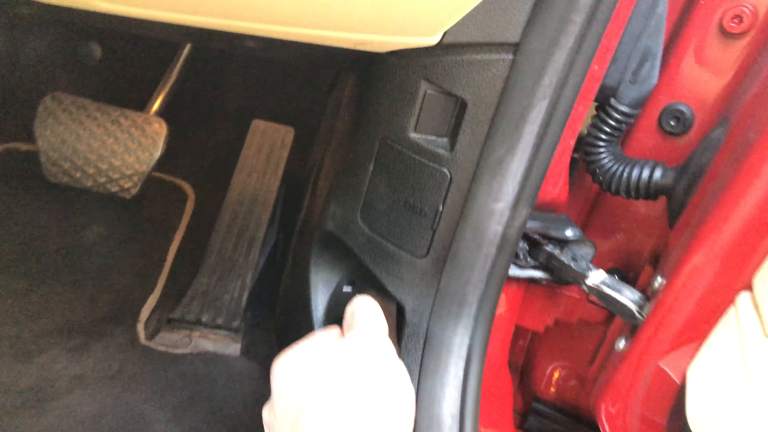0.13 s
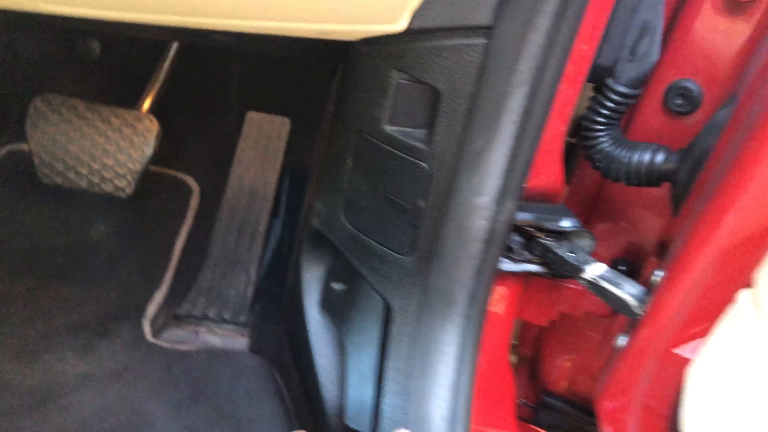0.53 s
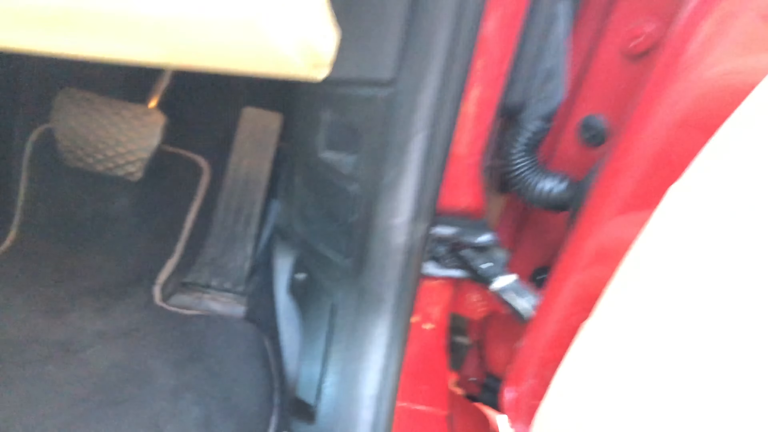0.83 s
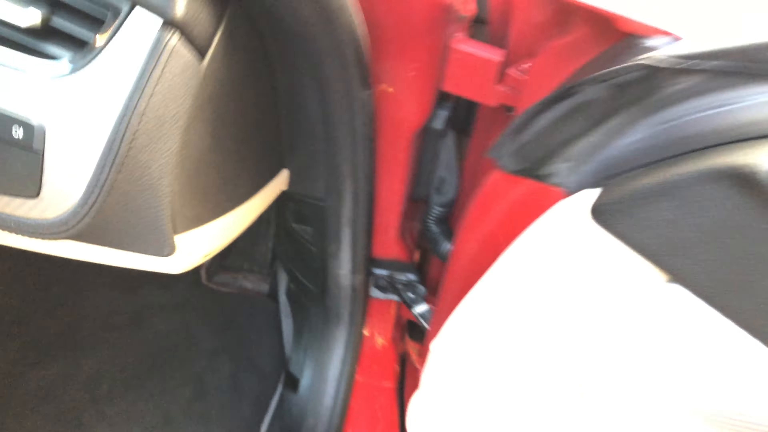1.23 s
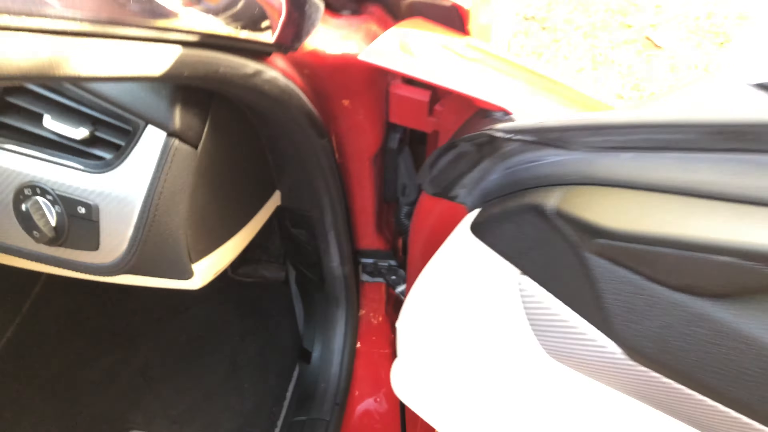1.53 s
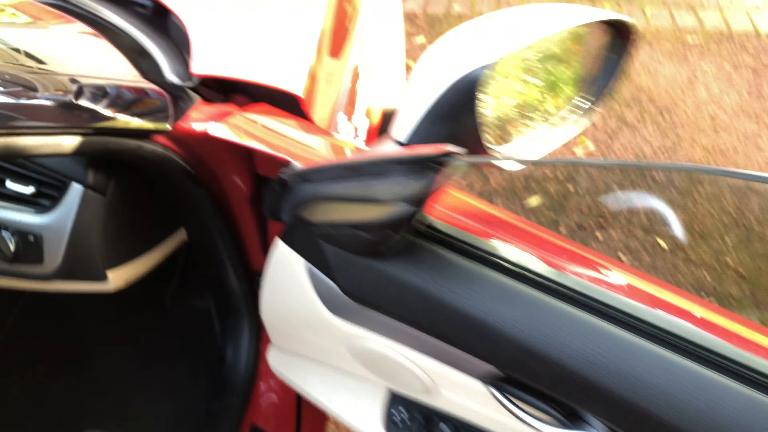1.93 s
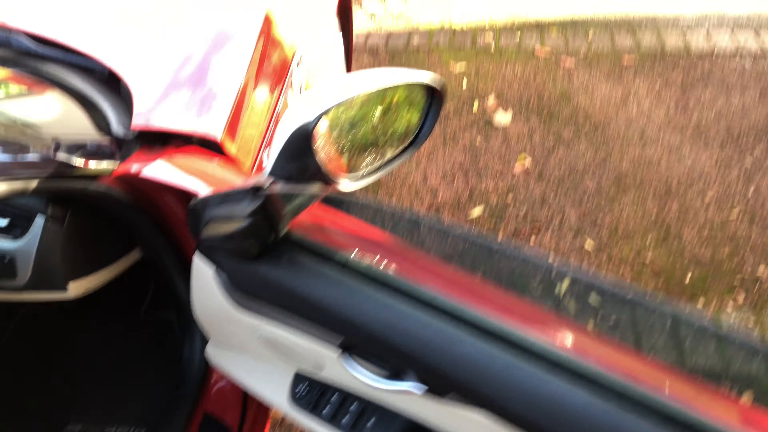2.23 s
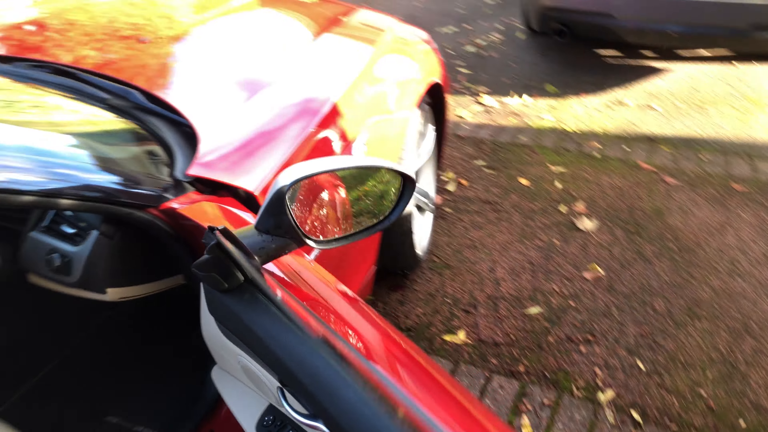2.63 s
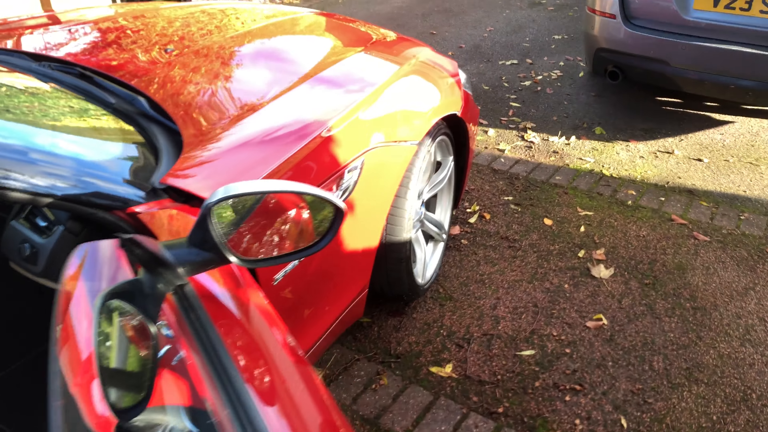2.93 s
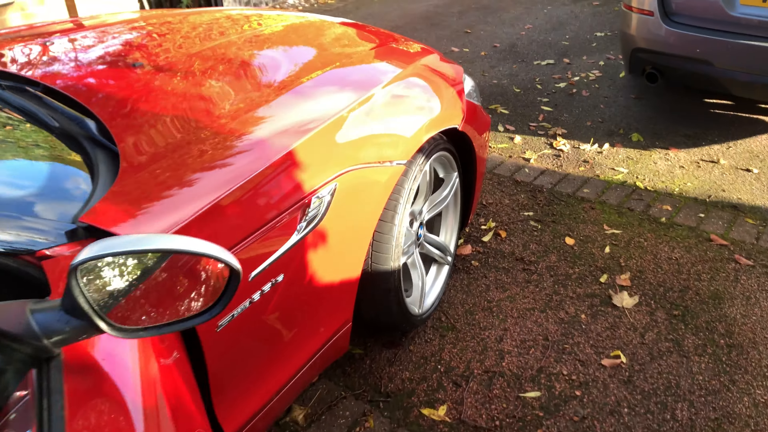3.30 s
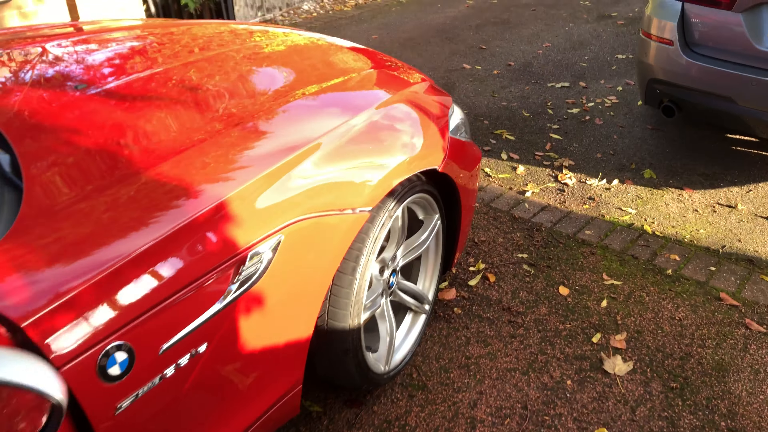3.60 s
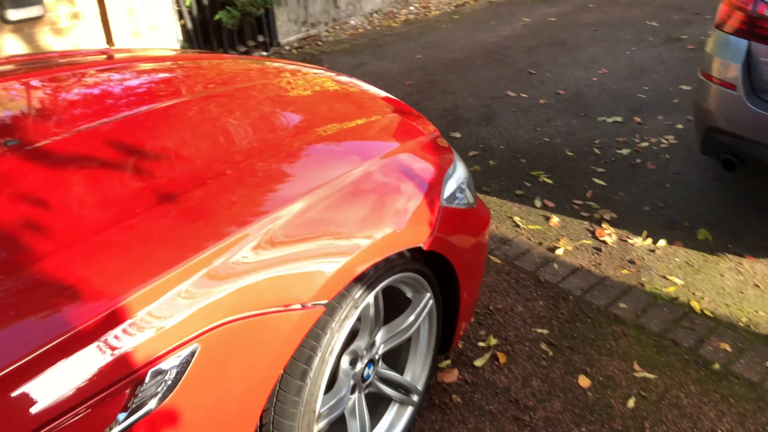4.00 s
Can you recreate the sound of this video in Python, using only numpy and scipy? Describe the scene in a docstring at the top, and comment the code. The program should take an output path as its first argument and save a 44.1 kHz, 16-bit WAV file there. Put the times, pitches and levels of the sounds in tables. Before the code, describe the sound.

In a car's footwell, a bonnet release lever is pulled with a sudden booming clunk, and the plastic handle snaps back. Clothes rustle and small clicks follow as someone stands and walks over gritty paving with dry leaves. Wind thumps on the close microphone, strongest midway, then eases. Distant traffic hums faintly, and a thin hiss rises near the end.

```python
"""In a car's footwell a hand pulls the bonnet release: the cable snaps the latch free, the body panels boom
and the plastic lever springs back. The person stands up and walks on paving strewn with dry leaves.
Plastic, grit and leaves click in short resonant bursts; cloth and soles rub in swells of grainy hiss.
Gusts thump on the microphone, far traffic hums, and a thin hiss rises near the end."""
import sys
import numpy as np
from scipy.fft import rfft, irfft, next_fast_len
from scipy.io import wavfile
from scipy.ndimage import map_coordinates

SR = 44100
rng = np.random.default_rng(int(sys.argv[2]) if len(sys.argv) > 2 else 0)


def to_wav(s):
    """Save 16-bit WAV."""
    ch = np.atleast_2d(s).T  # columns
    pcm = np.round(np.clip(ch, -1, 1) * 32767)  # PCM
    wavfile.write(sys.argv[1], SR, pcm.astype(np.int16))


N = 183279


def release():
    """Latch and lever knock the body: a few big panels ring, the small ones blur into a dying thud."""
    blows = [(.077, -6.5, 0.0031, 0.46), (.096, -15.5, 0.0036, 1.2), (0.212, -19, 0.0049, 0.55),
             (0.329, -25, 0.005, 0.85), (.395, -7, 0.004, 0.22), (0.48, -30, 0.0012, 0.21),
             (0.513, -21.5, 0.003, 0.44)]  # knocks into the body: t/s, level/dB, softness/s, ring length factor
    panel_modes = [(111, -7.5, 0.29), (190.7, -4, 0.088), (246.5, -5, 0.3), (427, 2, 0.11),
                   (583, 4.5, 0.096), (740, -2, 0.19), (1020, 19, 0.033)]  # big panels: f/Hz, level/dB, base t60/s
    rattle = [(60, -36), (150, 2), (300, 2.5), (600, -7), (1000, -11.5), (1600, -17.5), (3000, -48)]  # spectrum of the many small panels: f/Hz, level/dB
    boom = [(0.092, 86.1, 3.5, 0.012, 0.19)]  # the freed bonnet jumps and swings: t/s, f/Hz, level/dB, rise/s, t60/s
    snaps = [(0.331, -25), (.393, -7.5)]  # the lever springs back: t/s, level/dB
    lever_modes = [(1330, -14, 0.03), (1950, -6, 0.022), (3204, -5, 0.016), (5320, -5, 0.04),
                   (10930, -20, .02)]  # plastic lever: f/Hz, level/dB, base t60/s
    out, t = np.zeros(N), np.arange(SR // 2) / SR
    for s, db, soft, life in blows:
        thud = noise(rattle, len(t)) * amp(-60 * t / (0.49 * life)) * (1 - np.exp(-t / soft))
        add(out, s, amp(db) * (ring(panel_modes, soft, life, scatter_db=4.5) + amp(-9) * thud))
    for s, hz, db, rise, t60 in boom:
        envelope = amp(db - 60 * t / t60) * (1 - np.exp(-t / rise)) ** 2
        add(out, s, envelope * np.sin(2 * np.pi * hz * t))
    for s, db in snaps:
        add(out, s, amp(db) * ring(lever_modes, soft=.0001, life=0.71, scatter_db=0.5))
    return out


def ring(modes, soft, life, scatter_db):
    """A struck part's modes, t60 scaled by life; a soft blow slows the attack and dulls the highs."""
    t = np.arange(SR // 2) / SR
    tones = np.zeros(len(t))
    for hz, db, t60 in modes:
        decay = amp(db + rng.normal(0, scatter_db) - 60 * t / (t60 * life))
        tones += decay / (1 + (hz * soft) ** 2) * np.sin(2 * np.pi * (hz * t + rng.random()))
    return tones * (1 - np.exp(-t / soft))


def clicks():
    """Plastic, grit and leaves: each click is a broad crack, a ragged three-band burst and a clean ping."""
    hits = [(0.055, -15, 3120, -4, -33, 0.0081), (0.0601, -15, 1530, -0.5, -28, 0.023),
            (0.0709, -9, 2610, -0.5, -13, 0.059), (0.0766, -2, 4860, -2, -1, 0.036),
            (0.131, -15.5, 1910, -19, -4, 0.038), (0.2072, -28.5, 1480, 5, -16, 0.077),
            (0.2547, -27, 5680, -3, -12, 0.035), (0.328, -18.5, 4730, -18, -24, 0.033),
            (0.3312, -16, 3630, -31, -25, 0.061), (0.345, -11, 7140, -9, 1, 0.023),
            (0.356, -29, 7000, 4, -15, 0.046), (0.3856, -26, 4060, 0, -6, 0.078),
            (0.392, -4, 5290, -22, 5.5, 0.034), (0.4405, -28, 1990, 5, -19, 0.025),
            (0.4758, -33, 1730, 0.5, -18, 0.082), (0.5155, -11, 7700, -6, 3, 0.011),
            (0.521, -26, 4500, -16, -17, 0.051), (0.5321, -21, 1860, -30, -9, 0.035),
            (0.6386, -12.5, 2334, -9.5, -7, 0.072), (.641, -11.5, 5600, -34, -21, 0.068),
            (0.655, -19.5, 2760, -7.5, -6, 0.045), (0.704, -32, 2980, -18, -9, .036),
            (0.735, -27.5, 5200, -23, 5, .026), (0.763, -16, 2950, -10.5, -10, 0.048),
            (0.785, -24, 2270, -24, -21, 0.016), (.917, -27, 3300, -25, -10, 0.022),
            (1.013, -33, 4960, -25, -15, 0.015), (1.039, -23.5, 1640, -3, -6, 0.017),
            (1.0968, -27.5, 2570, 3, -10, 0.024), (1.1317, -22, 2660, 4.5, -11, 0.033),
            (1.1572, -26, 2900, 1, -10, 0.034), (1.1803, -28.5, 3130, -9, -7, 0.02),
            (1.1953, -36.5, 6860, -7, -2, .03), (1.244, -22, 3170, -1, -12, 0.026),
            (1.255, -19, 2150, -8, -27, 0.011), (1.289, -32, 3060, -1, -8, 0.019),
            (1.3753, -34, 4560, -12, -9, 0.079), (1.4027, -24, 3270, -6, -24, 0.038),
            (1.43, -28.5, 6800, -20, -1, 0.021), (1.513, -27, 2350, -19, -8, 0.015),
            (1.5314, -21.5, 1670, -34, -23, 0.028), (1.557, -44, 9050, -10, 7, .025),
            (1.8079, -51, 5260, 14.5, 12, 0.18), (1.8564, -27, 2770, 0, -22, 0.024),
            (1.878, -31, 2830, -1, -16, 0.054), (1.893, -26.5, 4130, -24, -21, .023),
            (1.908, -16, 2300, -37, -34, 0.019), (1.927, -13, 3930, -23, -26, 0.028),
            (1.9332, -7.5, 4010, -28, -30, 0.047), (1.936, -8.5, 2620, -23, -29, .03),
            (1.986, -21, 5060, -25, -8, 0.0063), (2.005, -20.5, 4240, -7, -17, 0.027),
            (2.0363, -24.5, 2110, -28, -22, 0.15), (2.0508, -16, 3570, -28, -32, 0.046),
            (2.0535, -17.5, 3690, -34, -9.5, 0.043), (2.092, -26.5, 2210, -20, 0, 0.1),
            (2.099, -10.5, 2130, -24, -7.5, 0.03), (2.1047, -16, 1850, -3.5, 0, .047),
            (2.357, -37.5, 3880, -16, -21, 0.042), (2.5678, -32.5, 2070, 3.5, -3.5, 0.022),
            (2.7136, -24, 2660, -6.5, -8, 0.04), (2.7548, -34, 1740, 1, -1, .04),
            (2.788, -40, 4280, -6, -5, 0.075), (2.828, -34, 1380, 3.5, -7, 0.047),
            (2.968, -48, 9000, -20, 0, 0.017), (3.017, -42.5, 2530, 0, -3, .059),
            (3.208, -34.5, 1930, 2, -9, 0.052), (3.3787, -35.5, 1890, 2, -30, 0.077),
            (3.3969, -26, 1710, -7, -23, 0.054), (3.539, -35.5, 1480, 7.5, -22, 0.021),
            (3.571, -39, 3100, -22, -25, .025), (3.807, -24.5, 3230, -24, -30, 0.012),
            (3.888, -37, 3160, 3, -30, 0.055), (3.8985, -31.5, 1420, 0, -33, 0.059),
            (3.914, -32, 1690, -20, -28, 0.044), (3.963, -35, 3000, -4, -23, 0.16),
            (3.994, -25.5, 1540, -2, -19, 0.088), (4.024, -29.5, 1590, -23, -30, .054),
            (4.0442, -28, 2960, -9, -27, 0.02), (4.08, -39, 6500, -30, -4, 0.04),
            (4.124, -27, 1640, -9, -18, 0.033)]  # clicks: t/s, level/dB, f/Hz, dull offset/dB, bright offset/dB, main t60/s
    out, t = np.zeros(N), np.arange(SR // 8) / SR
    attack = 1 - np.exp(-t / .0004)

    def tail(life):
        """A decay with a small, ten times faster spike on its front."""
        return (amp(-60 * t / life) + 0.13 * amp(-60 * t / (0.1 * life))) * attack

    for s, db, hz, dull_db, bright_db, t60 in hits:
        ragged_db = 3 * np.repeat(rng.standard_normal(len(t) // 40 + 1), 40)[:len(t)]
        layers = [(bandpass(hz, q=1.4, stages=2), tail(t60), 0),
                  (bandpass(900, q=1.1, stages=2), tail(1.17 * t60), dull_db),
                  (bandpass(11000, q=.9, stages=2), tail(0.86 * t60), bright_db),
                  (bandpass(3000, q=0.97), amp(-60 * t / 0.0039), -4.5)]  # the broad crack
        for band, envelope, layer_db in layers:
            burst = filtered(rng.standard_normal(len(t)) * amp(ragged_db), band) * envelope
            burst *= np.linalg.norm(envelope) / np.linalg.norm(burst)  # the envelope sets the energy
            add(out, s, amp(db + layer_db - 9) * burst)
        ping = amp(-60 * t / (.45 * t60)) * attack * np.sin(2 * np.pi * hz * t)
        add(out, s, amp(db - 5) * ping)
    return out


def rustle():
    """Cloth and soles rub: hiss roughened by grains and ticks, swelling with each stroke."""
    strokes = [(.09, -34.5, -33.5, 0.043, 0.14), (.2, -44, -53, 0.3, 0.31), (.4, -35.5, -36, 0.13, 0.074),
               (.52, -31, -32, 0.012, 0.084), (.63, -42, -36.5, 0.29, 0.11), (.74, -47, -41, 0.24, 0.14),
               (.93, -41.5, -35, 0.37, 0.16), (1.07, -51.5, -57, 0.31, 0.74), (1.43, -45, -50, 0.45, 0.36),
               (1.87, -48, -55, 0.13, .3), (2.0, -43, -51.5, 0.44, 0.39),
               (2.11, -40.5, -43.5, 0.097, 0.079), (2.76, -55.5, -59, 0.6, 0.24),
               (3.4, -42.5, -53.5, 0.06, 0.19), (3.65, -58, -87, 0.24, 1), (4.0, -41, -57, 0.12, 0.35)]  # rubs: peak t/s, coarse level/dB, fine level/dB, rise/s, fade/s
    coarse = [(600, -45), (1200, 8), (2200, 8), (2800, 5.5), (3500, 4.5), (4500, 1.5), (6000, -5.5),
              (9000, -18.5), (14000, -50)]  # spectrum of the midrange scrape: f/Hz, level/dB
    fine = [(3000, -8), (6000, -6), (9000, -6), (13000, -7), (16000, -4)]  # spectrum of the airy top: f/Hz, level/dB
    s, coarse_peaks, fine_peaks, rise, fade = np.transpose(strokes)
    coarse_db = swells(s, coarse_peaks, rise, fade, drop_db=32, rest_db=-63)
    fine_db = swells(s, fine_peaks, rise, fade, drop_db=32, rest_db=-64)
    grains = (rng.random(N) < .02) * amp(3 * rng.standard_normal(N)) * rng.standard_normal(N)
    rub = amp(0.93 * wobble(70)) * (rng.standard_normal(N) + 0.47 * unit(grains))
    ticks_per_s, tick_db = 70, -7  # sparse sharp ticks of fabric and grit
    impulses = (rng.random(N) < ticks_per_s / SR) * rng.exponential(1, N)
    tick_envelope = np.convolve(impulses, amp(-np.arange(120) / 3))[:N]
    rub += amp(tick_db) * unit(tick_envelope * rng.standard_normal(N))
    return amp(coarse_db) * coloured(rub, coarse) + amp(fine_db) * coloured(rub, fine)


def boom_tail_and_gusts():
    """The car body rumbles out after the bonnet's boom; later, wind buffets the microphone port."""
    # the first two rows are the body's dying rumble, the later rows are puffs of wind
    surges = [(0.193, -21, -35, 0.22), (0.267, -28, -33.5, 0.21), (0.348, -32.5, -45, 0.25),
              (0.444, -29, -33, 0.2), (0.558, -35.5, -44, 0.38), (0.861, -25.5, -25, 0.18),
              (1.028, -24, -31.5, 0.16), (1.103, -27, -28.5, 0.16), (1.196, -19.5, -29.5, 0.077),
              (1.281, -19, -20.5, 0.084), (1.35, -17.5, -13, 0.11), (1.485, -23, -46, 0.045),
              (1.642, -20.5, -16.5, 0.4), (1.705, -27, -16.5, 0.049), (1.789, -16, -11.5, 0.055),
              (1.844, -22, -28, 0.12), (1.929, -21, -24.5, 0.22), (2.067, -18.5, -15, 0.13),
              (2.216, -21, -15, 0.041), (2.31, -27, -33.5, 0.27), (2.429, -27, -29.5, 0.086),
              (2.537, -31.5, -44, 0.11), (2.668, -27.5, -33, 0.29), (2.804, -34.5, -53, 0.18),
              (2.927, -29, -37, 0.064), (2.996, -30, -46, 0.12), (3.12, -37.5, -57, 0.16),
              (3.201, -24.5, -25, 0.063), (3.394, -44.5, -49, 0.14), (3.686, -33.5, -38, 0.26),
              (3.935, -43, -62, 0.12)]  # peak t/s, rumble level/dB, flutter drive/dB, length/s
    rumble = [(20, -46), (40, -5), (70, -3.5), (110, -4), (160, -10), (300, -46)]  # bass spectrum: f/Hz, level/dB
    flutter = [(80, -53), (150, -4.5), (220, -3.5), (320, -9.5), (480, -32.5), (800, -64.5)]  # low-mid spectrum: f/Hz, level/dB
    tearing = [(200, -26.5), (350, 1), (500, 1.5), (750, -12.5), (1100, -21.5), (1600, -38)]  # midrange spectrum: f/Hz, level/dB
    s, rumble_peaks, drive_peaks, length = np.transpose(surges)
    rise, fade = 0.49 * length, 0.51 * length
    rumble_db = swells(s, rumble_peaks, rise, fade, drop_db=21.5, rest_db=-51.5)
    drive_db = swells(s, drive_peaks, rise, fade, drop_db=21.5, rest_db=-49)
    tear_db = 1.345 * drive_db - 6.5  # strong surges turn brighter faster than they turn louder
    out = amp(rumble_db) * unit(amp(1.27 * wobble(18)) * noise(rumble))
    lumps = amp(3.5 * wobble(45))
    out += amp(drive_db - 6) * unit(lumps * noise(flutter))
    return out + amp(tear_db) * unit(lumps * noise(tearing))


def eddies():
    """The wind's strongest single eddies burst on the port, each a thump of a few cycles."""
    thumps = [(.872, -20, 280), (1.103, -19.5, 244), (1.204, -20, 170), (1.22, -18.5, 73.6),
              (1.258, -21, 200), (1.28, -30, 111), (1.303, -8.5, 220), (1.336, -13, 208),
              (1.354, -2.5, 504), (1.354, -9.5, 123), (1.409, -22, 84), (1.502, -20, 96),
              (1.577, -14.5, 225), (1.582, -17, 490), (1.592, -14, 450), (1.605, -11.5, 600),
              (1.614, -9.5, 212), (1.618, -16, 567), (1.624, -9.5, 91.6), (1.639, -1.5, 540),
              (1.651, -13, 300), (1.691, -17, 86), (1.702, -14.5, 229), (1.708, -17, 580),
              (1.737, -24, 100), (1.761, -16.5, 312), (1.761, -27, 520), (1.771, -11, 90),
              (1.783, -9.5, 490), (1.802, -31, 220), (1.856, -13, 87), (1.908, -27.5, 199),
              (1.935, -16.5, 213), (2.031, -13.5, 346), (2.041, -10.5, 208), (2.069, -11.5, 186),
              (2.087, -9, 248), (2.178, -23.5, 236), (2.212, -14, 514), (2.218, -6.5, 224),
              (2.242, -16, 82), (2.292, -20.5, 171), (2.344, -26.5, 188), (2.445, -21.5, 90.5),
              (2.672, -20, 175), (2.727, -19, 92), (2.934, -23, 89), (2.989, -26.5, 101),
              (3.192, -13.5, 170), (3.203, -13.5, 110), (3.789, -27.5, 84)]  # eddies: peak t/s, level/dB, starting f/Hz
    rise_cycles = 1.074
    out, t = np.zeros(N), np.arange(SR // 10) / SR
    for s, db, hz in thumps:
        age = t * hz / rise_cycles  # 1 at the peak
        envelope = (age * np.exp(1 - age)) ** 3
        cycles = hz * t * (1 - 0.051 * age) + rng.random()  # the eddy slows as it leaves
        add(out, s - rise_cycles / hz, amp(db) * envelope * np.sin(2 * np.pi * cycles))
    return out


def traffic():
    """Far traffic: a dull, slowly breathing bed of hum."""
    fader = [(0, -55.5), (.3, -57), (.8, -51.5), (1.6, -56.5), (2.2, -51), (2.5, -51), (2.8, -47.5),
             (3.3, -49.5), (4.16, -48.5)]  # loudness of the hum: t/s, level/dB
    hum = [(24, -27), (40, -5.5), (104, -5), (215, -11), (444, -12), (620, -9), (800, -9), (1200, -13),
           (1600, -14.5), (2200, -26.5), (2900, -34), (3560, -49), (14800, -58), (16000, -77)]  # its spectrum: f/Hz, level/dB
    level_db = np.interp(np.arange(N) / SR, *np.transpose(fader))
    return amp(level_db + 0.33 * wobble(1.4)) * noise(hum)


def thin_hiss():
    """A faint hiss in two narrow bands swells near the end."""
    rises = [(3.68, -60, 0.28, .3), (3.92, -52, 0.32, 0.39)]  # swells of hiss: peak t/s, level/dB, rise/s, fade/s
    bands = [(2500, -25), (3100, -1), (3600, 5.5), (4300, -5), (5500, -28), (6300, -23), (7200, -33)]  # its spectrum: f/Hz, level/dB
    return amp(swells(*np.transpose(rises), drop_db=32, rest_db=-80)) * noise(bands)


def amp(db):
    """Gain of a level in dB."""
    return 10 ** (np.asarray(db) / 20)


def unit(x):
    """x at rms 1."""
    return x / np.sqrt(np.mean(x ** 2) + 1e-20)


def wobble(rate):
    """A smooth random curve, rate knots a second."""
    return map_coordinates(rng.standard_normal(int(N * rate / SR) + 4), [np.arange(N) * rate / SR])


def swells(times, peaks_db, rises, fades, drop_db, rest_db):
    """Envelope in dB over a steady floor; each swell is drop_db down a rise before and a fade after."""
    t = np.arange(0, N + 64, 64) / SR
    since_peak = t - times[:, None]
    away = np.where(since_peak < 0, -since_peak / rises[:, None], since_peak / fades[:, None])
    power = amp(2 * (peaks_db[:, None] - drop_db * away)).sum(0) + amp(2 * rest_db)
    return np.interp(np.arange(N) / SR, t, 10 * np.log10(power))


def filtered(x, response):
    """x through a complex frequency response."""
    size = next_fast_len(len(x) + 8192)
    return irfft(rfft(x, size) * response(np.fft.rfftfreq(size, 1 / SR)), size)[:len(x)]


def coloured(x, points):
    """x through an EQ curve of (f/Hz, level/dB) points on a log axis, at rms 1."""
    f, db = np.transpose(points)
    return unit(filtered(x, lambda hz: amp(np.interp(np.log(hz + 1), np.log(f), db, -120, -120))))


def noise(spectrum, samples=N):
    """Noise with the given spectrum, at rms 1."""
    return coloured(rng.standard_normal(samples), spectrum)


def bandpass(centre_hz, q, stages=1):
    """Response of causal band-passes in series."""
    width_hz = centre_hz / q
    return lambda f: (1j * f * width_hz / (centre_hz ** 2 - f * f + 1j * f * width_hz)) ** stages


def add(track, s, sound):
    """Mixes a sound in at time s."""
    part = track[max(round(s * SR), 0):][:len(sound)]
    part += sound[:len(part)]


def scene():
    """All sources in one mono mix."""
    return (release() + clicks() + rustle() + boom_tail_and_gusts() + eddies()
            + traffic() + thin_hiss())[None]


def record(dry):
    """The microphone thins the deepest bass, soft-clips the loudest peaks and rolls off the very top."""
    low_hz, top_hz = 34.3, 15800
    heard = filtered(dry[0], lambda hz: (1j * hz / (low_hz + 1j * hz)) ** 2)
    clipped = heard / (1 + np.abs(heard) ** 8) ** (1 / 8)
    return filtered(clipped, lambda hz: amp(-np.clip(hz - top_hz, 0, None) / 14))[None]


dry = scene()
out = record(dry)
to_wav(out)
```